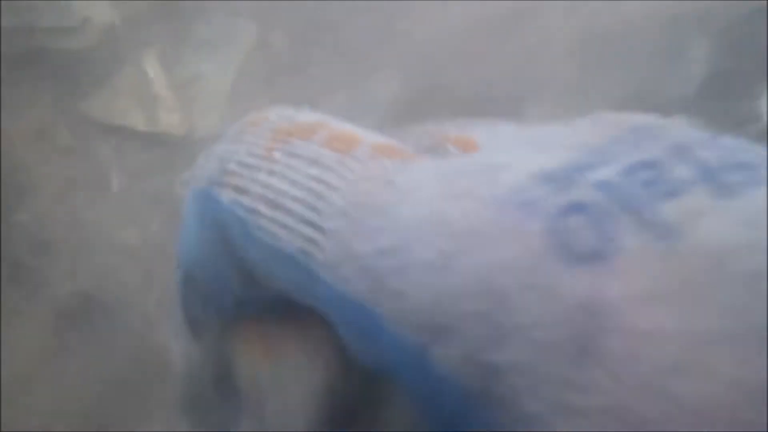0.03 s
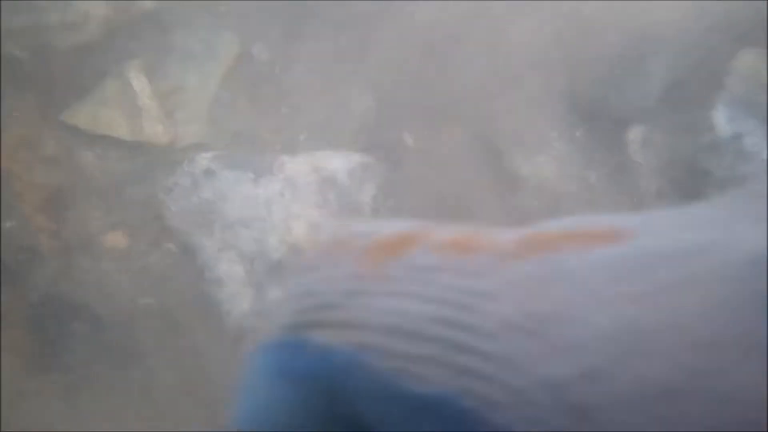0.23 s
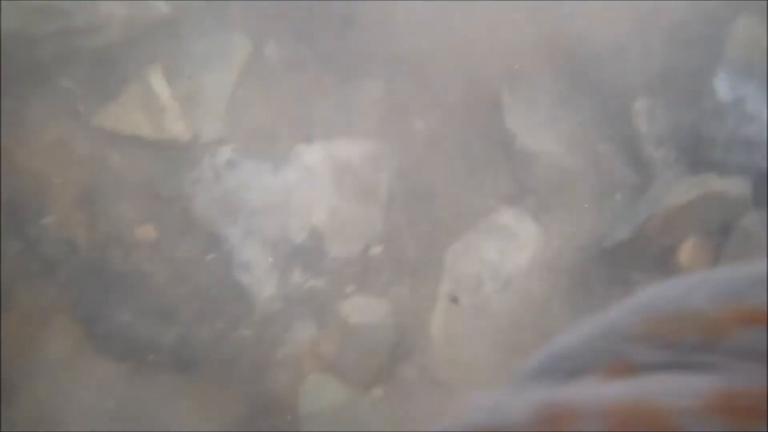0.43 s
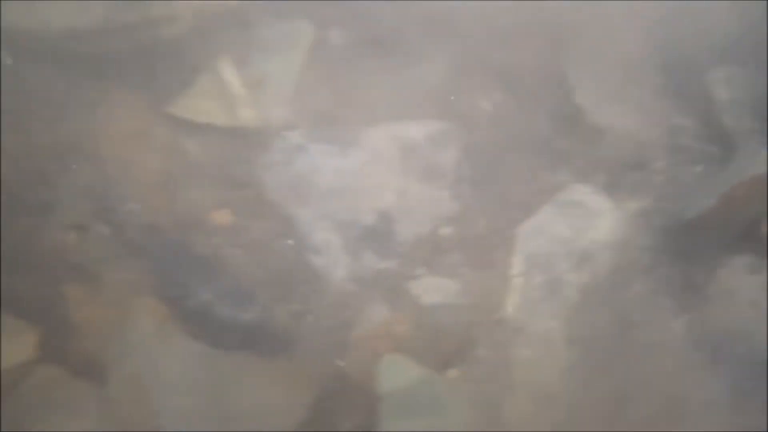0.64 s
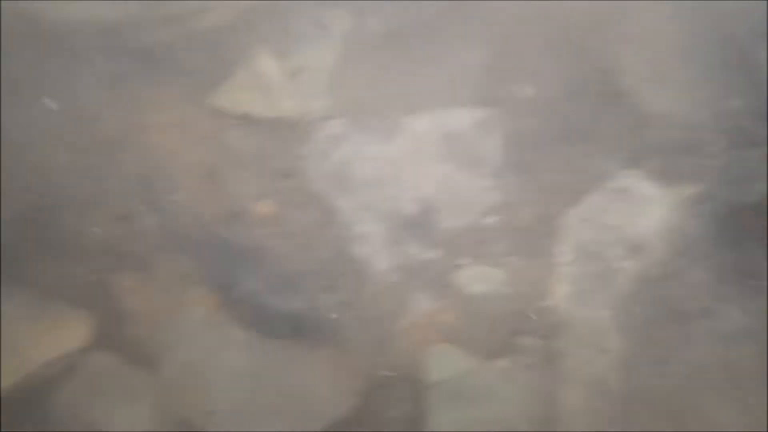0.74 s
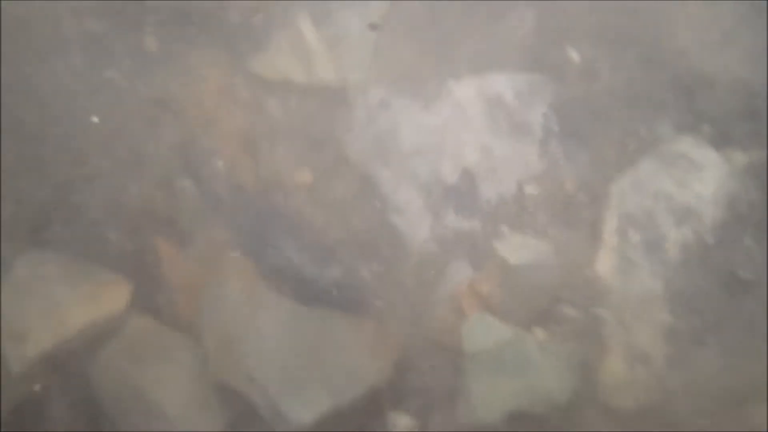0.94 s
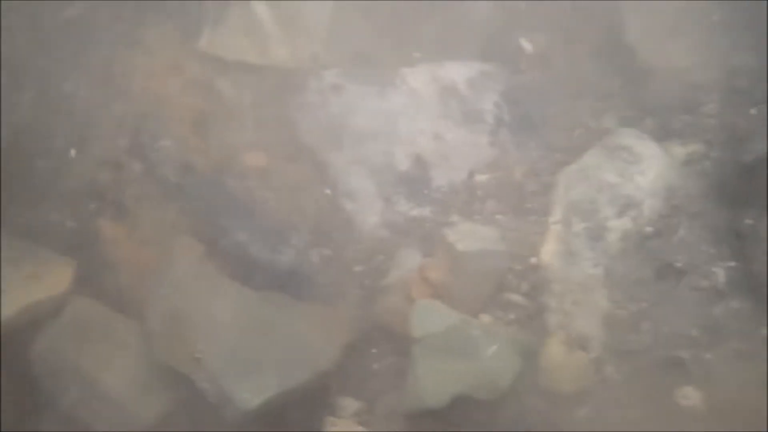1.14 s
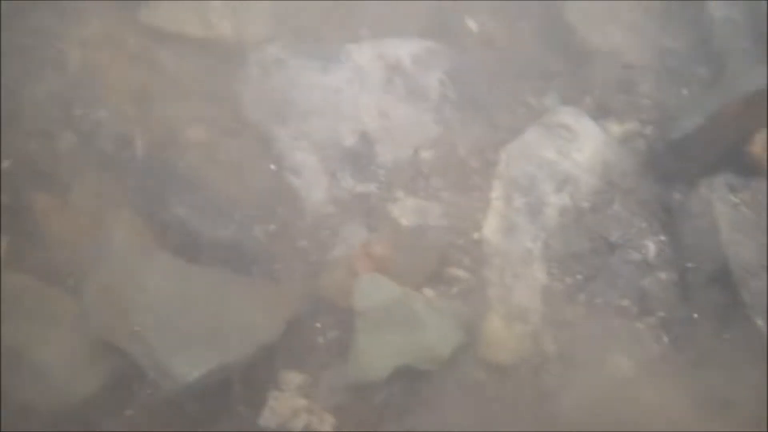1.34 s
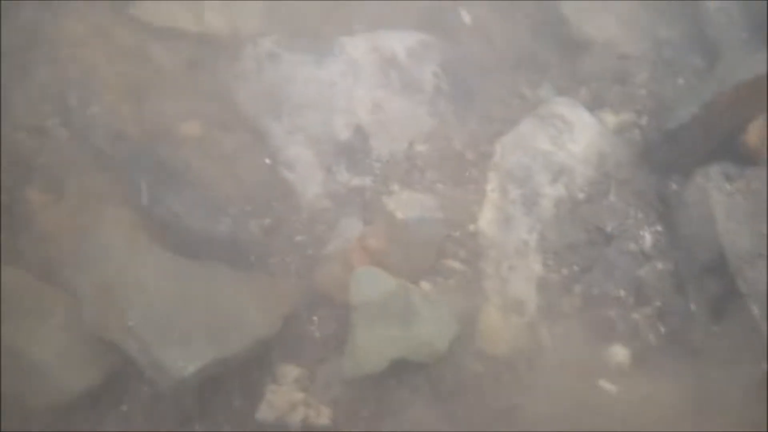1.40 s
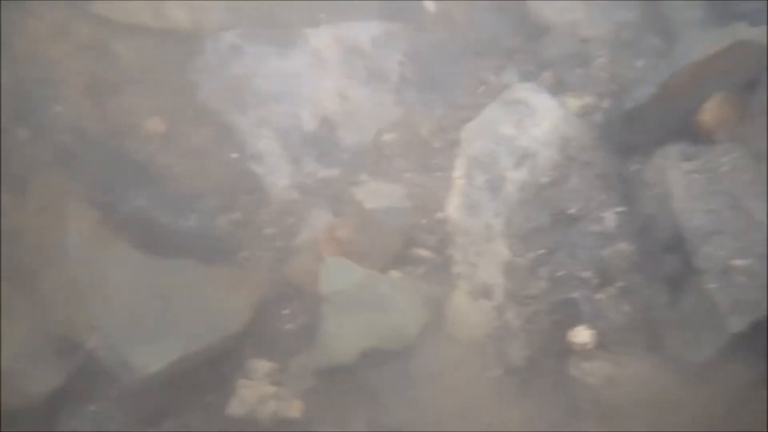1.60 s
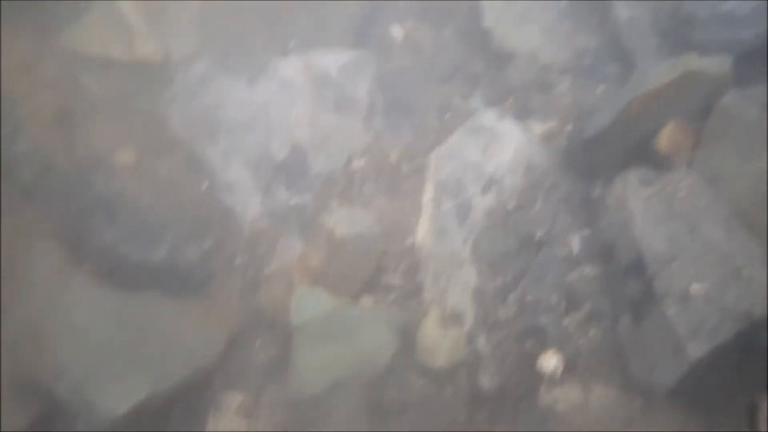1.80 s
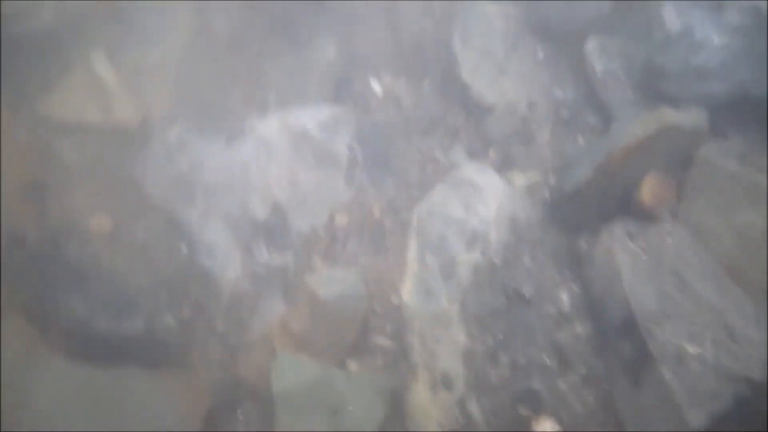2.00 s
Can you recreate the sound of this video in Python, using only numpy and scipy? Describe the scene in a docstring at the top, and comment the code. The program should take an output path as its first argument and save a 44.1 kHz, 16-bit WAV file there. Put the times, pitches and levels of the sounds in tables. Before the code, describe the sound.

Muffled underwater knocks and clicks of stones stirred by hand, over a low water rumble.

```python
"""A gloved hand fans and stirs gravel on a creek bed for two seconds, beside a camera under water.
From the start, pushed water churns, gravel rolls and sand grates over a faint rumble and hiss.
Gravel crunches, stones knock and pebbles tick, building to the hardest knocks near 0.4 seconds.
After a lull around 0.8 seconds, the hand stirs again near 1, 1.4 and 1.8 seconds.
All along, the camera's sealed case muffles the sounds and makes them honk in the left microphone."""
import sys
import numpy as np
from scipy import signal
from scipy.fft import rfft, irfft
from scipy.io import wavfile

SR = 44100
rng = np.random.default_rng(int(sys.argv[2]) if len(sys.argv) > 2 else 0)


def to_wav(s):
    """Save 16-bit WAV."""
    ch = np.atleast_2d(s).T  # columns
    pcm = np.round(np.clip(ch, -1, 1) * 32767)  # PCM
    wavfile.write(sys.argv[1], SR, pcm.astype(np.int16))


N = 90625
HIT_TIME = np.arange(3072) / SR  # seconds since a hit began

# How the case shapes sound. Each row: frequency in Hz, left gain in dB, right gain in dB.
CASE_TONE = [(40, -2.5, -9), (167, -3.5, -6), (277, 0, 1.5), (317, -3, 7.5), (376.7, 12, 12), (610, 13, -4),
             (879, 3, -8), (1028, 6, -8.5), (1444, -8, -10), (1555, -17.5, -30), (1842, 1, -6.5),
             (2144, -20.5, -36), (2280, 0.5, -11.5), (2950, -1, -6.5), (3300, -12.5, -55), (3716, 4.5, 2.5),
             (4130, -5.5, -19.5), (4980, 0, -5.5), (7300, -7, -2), (8200, 0.5, -7), (9070, -1.5, -11),
             (13900, 3, 6.5)]
# The sweeps of the hand. Each row: time in seconds, water level in dB, gravel level in dB.
HAND_SWEEPS = [(0, -30.5, -37), (.09, -31, -49.5), (.14, -20, -39.5), (.24, -21.5, -37), (.3, -15, -31),
               (.355, -25.5, -37), (.42, -15.5, -28.5), (.47, -36.5, -44.5), (.55, -37.5, -38.5),
               (.64, -42, -56.5), (.73, -43, -62), (.84, -49, -63), (.91, -33.5, -41), (.95, -28.5, -39.5),
               (1.1, -35, -45.5), (1.19, -34.5, -48), (1.25, -37, -62), (1.32, -29.5, -39.5),
               (1.4, -25.5, -41.5), (1.47, -25.5, -38.5), (1.53, -38, -66), (1.66, -38, -53),
               (1.75, -35, -66), (1.83, -24, -43.5), (1.93, -30, -48.5), (2.04, -31, -55)]
# Sand grating. Each row: time in seconds, grit level in dB, level of the sand's thin squeak in dB.
SAND_LEVELS = [(0, -57, -82), (.1, -76, -66), (.15, -60, -56), (.23, -60.5, -59), (.3, -49, -44),
               (.35, -68.5, -64), (.41, -59.5, -77), (.432, -46.5, -33), (.46, -85, -75), (.5, -69.5, -75),
               (.535, -66, -54), (.56, -80, -107), (.63, -95, -101.5), (.87, -90, -95), (.92, -71.5, -75),
               (1.0, -68, -78), (1.11, -81, -87), (1.16, -75, -68.5), (1.21, -71, -75), (1.24, -83, -104),
               (1.32, -70, -88), (1.42, -69, -82), (1.5, -84, -94.5), (1.75, -89, -98), (1.8, -76, -94),
               (1.86, -73.5, -88), (2.04, -77, -90)]
# The hiss. Each row: time in seconds, level in dB.
HISS_LEVELS = [(0, -58), (0.43, -52.5), (0.47, -67.5), (0.9, -73), (1.5, -65.5), (2.05, -60.5)]
# Gravel giving way. Each row: start in seconds, level in dB, fade time in seconds.
CRUNCHES = [(0.016, -51, 0.016), (0.44, -22, 0.006), (.456, -48, .009), (0.529, -37.5, 0.0096),
            (0.899, -60, .025), (1.08, -60, 0.022), (1.343, -44.5, 0.015), (1.792, -41.5, 0.018),
            (1.856, -48.5, .006)]
# Stones knocking. Each row: start in seconds, knock level in dB, knock pitch in Hz,
# knock fade time in seconds, thump level in dB, thump pitch in Hz, clack level in dB.
KNOCKS = [(0.0192, -22.5, 610.0, 0.00038, -30, 82, -70), (0.032, -25.5, 610.0, 0.00069, -35, 113, -71),
          (0.039, -25, 540, 0.0007, -17, 106, -56), (0.118, -40, 636, 0.00032, -18, 141, -64),
          (0.153, -45, 617, 0.0005, -26, 159, -72), (0.178, -25, 595, 0.0023, -16, 128, -43),
          (0.2164, -20, 566, 0.002, -9, 141, -42), (0.249, -23, 635, 0.00057, -12, 116, -65),
          (0.2721, -22.5, 700, 0.0016, -24, 131, -61), (0.2906, -13, 650.0, 0.0024, -4, 89, -56),
          (0.3192, -11, 670, 0.0023, -12, 140, -59), (0.3277, -11.5, 610.0, 0.002, -15, 114, -59),
          (0.3312, -16, 644, 0.0014, -4, 120, -64), (0.3635, -22, 640.0, 0.0008, -33, 83, -39),
          (0.3795, -21.5, 585, 0.0016, -7, 119, -59), (0.386, -23, 582, 0.00094, -40, 128.7, -54),
          (0.401, -2.5, 583, 0.001, -6.5, 92.6, -44.5), (0.4335, -9.5, 630, 0.0013, -7, 129, -39.5),
          (0.4398, 2.5, 723, 0.0003, -16, 158, -21), (0.4909, -28, 634, 0.00041, -20, 136, -65),
          (0.532, -19, 560, 0.0009, -17.5, 147, -34), (0.5777, -5.5, 730, 0.0011, -5.5, 158, -17),
          (0.5958, -12.5, 710, 0.00027, -11, 170, -35.5), (0.602, -17.5, 674, 0.0025, -16.5, 151, -48),
          (0.746, -40.5, 580, 0.0016, -63, 126, -79), (0.784, -41.5, 645, 0.00083, -39, 92, -59),
          (0.9246, -14.5, 720, 0.00042, -12, 164, -36), (0.931, -19.5, 597, 0.0015, -16.5, 170, -48),
          (0.936, -18.5, 660, 0.0007, -14, 149, -56), (0.964, -27, 626, 0.0011, -18, 144.5, -50),
          (0.992, -5, 690, 0.00075, -2.5, 150.6, -34), (1.0047, -48, 576, 0.0005, -16.5, 144, -62),
          (1.021, -23.5, 627, 0.0023, -18.5, 136, -56), (1.0576, -20, 730, 0.0013, -19.5, 147, -61),
          (1.064, -25.5, 620, 0.0015, -24, 145, -62), (1.171, -24.5, 680, 0.002, -22.5, 154, -71),
          (1.201, -25, 640, 0.0009, -23, 200, -75), (1.2074, -20.5, 699, 0.0046, -17, 190, -68),
          (1.344, -11.5, 509, 0.0037, -59, 187, -38), (1.3522, -10, 537, 0.002, -7, 196, -40),
          (1.3737, -33, 580.0, 0.00062, -17.5, 136, -63), (1.408, -31, 660, 0.0038, -20, 153, -56),
          (1.548, -37.5, 644, 0.01, -53, 102, -61), (1.571, -37.5, 626, 0.0002, -22.5, 100, -57),
          (1.612, -33.5, 664, 0.01, -51, 112, -66), (1.652, -43.5, 853, 0.00036, -39.5, 130, -56),
          (1.7707, -28.5, 610.0, 0.0045, -17, 172, -77), (1.7932, -21, 744, 0.0014, -18, 152, -56),
          (1.8008, -17.5, 650, 0.0017, -12.5, 205, -40.5), (1.8129, -16.5, 680, 0.0024, -19.5, 104, -34),
          (1.868, -29, 654, 0.00034, -16.5, 78.5, -56), (1.9098, -25.5, 636, 0.0039, -24, 108, -50.5),
          (1.929, -27.5, 610, 0.0021, -25, 161, -52), (1.988, -31.5, 610.0, 0.0039, -23, 139, -68)]
# The notes a stone rings with. Each row: pitch in Hz, relative level in dB, fade time in seconds.
STONE_NOTES = [(1873, 3, 0.0019), (2714, 2.5, 0.0013), (3850, -7, 0.001), (4530, -9, .0011)]
# Pebbles hitting the case. Each row: start in seconds, peak level in dB, ring pitch in Hz,
# fade time of the crunch in seconds, ring boost in dB.
TICKS = [(.0887, -42.5, 8200, 0.00073, 8), (0.1502, -40, 4900, 0.0015, 9), (0.2177, -35.5, 8500, .0027, 12),
         (.2732, -40, 7700, 0.0028, 21), (.286, -34, 6960, 0.0018, 31), (.2935, -32.5, 7600, 0.0033, 23),
         (0.3107, -39.5, 7160, 0.0056, 34), (.363, -52, 3680, 0.0011, 15), (0.4002, -36, 5430, .0013, 6.5),
         (0.428, -27, 8200, 0.0034, 6), (0.427, -24.5, 3850, 0.0012, 21), (.433, -29, 8200, 0.0025, 31.5),
         (0.4395, -25, 5500, .0007, 8), (0.4455, -39, 5120, 0.0017, 4), (0.5128, -45, 7600, 0.00073, 14),
         (0.527, -34.5, 8200, 0.002, 22), (0.5785, -37, 7200, 0.00022, 26), (0.9646, -46, 5350, .0009, 4),
         (0.9927, -40, 8200, 0.0032, 13), (1.0577, -43.5, 8200, 0.0022, 22), (1.0583, -51, 5500, 0.0011, 8),
         (1.172, -48, 8600, 0.0013, 22), (1.195, -50, 8600, 0.0027, 14), (1.2076, -44.5, 8500, 0.0057, 16),
         (1.2111, -42, 5130, 0.0012, 17), (1.277, -43, 4400, 0.00053, 13),
         (1.3095, -38.5, 12040, 0.0046, 8), (1.3432, -35.5, 8200, 0.0015, 5),
         (1.3822, -52, 5270, 0.00087, 16), (1.4297, -51, 8300, .0006, 10),
         (1.652, -54, 2430, 0.00085, 11.5), (1.7709, -34.5, 7400, 0.0017, 17),
         (1.7785, -41.5, 5550, 0.0032, 8), (1.8004, -49, 7250, .001, 7), (1.8124, -43, 7080, 0.00036, 29),
         (1.8131, -31.5, 3400, 0.0018, 22), (1.856, -51.5, 2470, 0.0014, 19), (1.909, -52, 3300, 0.001, 17),
         (1.9287, -55.5, 8650, 0.0011, 20)]

# The tone of each sound, from low to high. Each row: frequency in Hz, relative level in dB.
BIG_SWIRL_TONE = [(10, -32.5), (30, 6.5), (50, 5), (78, 0.5), (120, -3.5), (170, -5.5), (235, -22.5),
                  (450, -46.5), (900, -65.5), (2000, -79.5)]
SMALL_SWIRL_TONE = [(80, -31), (190, 1), (260, -6.5), (420, -39.5), (1500, -100)]
GRAVEL_TONE = [(40, -22), (160, 1.5), (300, 6), (450, -6), (700, 5), (1000, -11.5), (1400, -17),
               (2200, -25), (4000, -40.5), (12000, -73)]
SAND_TONE = [(200, -36.5), (1500, -6), (3000, -3.5), (5000, 7.5), (6500, -4), (7200, 8), (8000, -5.5),
             (9000, -2), (11000, -6), (15000, -3)]
SAND_SQUEAK_TONE = [(3000, -53), (6500, -25.5), (7200, -2.5), (7750, -10.5), (8050, 7.5), (8300, 6.5),
                    (8600, -4.5), (9100, -13.5), (15000, -48.5)]
CURRENT_TONE = [(20, -12), (140, 3.5), (210, -7.5), (300, -26), (600, -48.5), (1000, -25), (2000, -100)]
HISS_TONE = [(300, 8.5), (2000, -2.5), (3500, -11), (5500, -1.5), (9000, 1), (15000, 11)]
CRUNCH_TONE = [(200, -28), (700, -0.5), (1250, 5.5), (1700, -4.5), (2500, -19), (4000, -14), (8000, -35.5),
               (15000, -38.5)]
CLACK_TONE = [(100, 13), (700, 7.5), (1250, 26), (1700, -32), (2500, 20), (4000, 0.5), (7000, -4),
              (10000, -21.5), (15000, -7)]
PEBBLE_TONE = [(200, -22), (1500, -5), (4000, -1), (7000, 0), (9500, -3), (12000, -5), (15000, -10),
               (17000, -30)]


def gain(db):
    """Turns decibels into a number to multiply a sound by."""
    return 10 ** (np.asarray(db) / 20)


def curve(table, column=1):
    """Joins a table's points with straight lines, giving a value for every sample."""
    table = np.array(table)
    return np.interp(np.arange(N) / SR, table[:, 0], table[:, column])


def shape_tone(sound, tone, column=1, size=4096):
    """Turns each frequency up or down as a tone table says."""
    tone = np.array(tone)
    hz = np.fft.rfftfreq(size, 1 / SR)
    db = np.interp(np.log(hz + 1), np.log(tone[:, 0] + 1), tone[:, column])
    # These steps make a filter that rings only after a hit, never before it.
    cepstrum = irfft(np.log(gain(db)))
    cepstrum[1:size // 2] *= 2
    cepstrum[size // 2 + 1:] = 0
    response = irfft(np.exp(rfft(cepstrum)))[:size // 2]
    return signal.fftconvolve(sound, response)[:len(sound)]


def through_case(force, right_lag_s=0.00033):
    """A push on the case as two microphones hear it; low sounds reach the right one a little later."""
    samples = np.arange(len(force))
    late = np.interp(samples - right_lag_s * SR, samples, force, left=0)
    right = force + signal.lfilter(*signal.butter(1, 1500, fs=SR), late - force)
    return np.array([shape_tone(force, CASE_TONE, column=1), shape_tone(right, CASE_TONE, column=2)])


def lasting_sound(force, tone):
    """A long push, given a tone and heard through the case, with a typical size of one on the left."""
    heard = through_case(shape_tone(force, tone))
    return heard / heard[0].std()


def add_hit(mix, start_s, force, peak_db):
    """Adds a short push heard through the case, with its peak level set on the left."""
    heard = through_case(force)
    peak = abs(signal.hilbert(heard[0])).max()
    part = mix[:, round(start_s * SR):][:, :len(force)]
    part += gain(peak_db) * heard[:, :part.shape[1]] / peak


def grains(per_second, spread_db):
    """Tiny hits at random times, mostly small, a few large."""
    sizes = gain(spread_db * np.minimum(rng.exponential(1, N), 4))
    return sizes * rng.choice([-1, 1], N) * (rng.random(N) < per_second / SR)


def grain_stream(tone, per_second, spread_db, one_side_db):
    """A stream of grains heard through the case; some reach only one microphone."""
    shared, left, right = (lasting_sound(grains(per_second, spread_db), tone) for _ in range(3))
    return shared + gain(one_side_db) * np.array([left[0], right[1]])


def noise_burst(fade_s, db):
    """A puff of noise that dies away."""
    return gain(db) * rng.standard_normal(len(HIT_TIME)) * np.exp(-HIT_TIME / fade_s)


def contact(fade_s, crunch_db):
    """One sharp click and the brief crunch that follows it."""
    return (HIT_TIME == 0) + noise_burst(fade_s, crunch_db)


def ring(hz, rise_s, fade_s):
    """A single note that swells and quickly dies away."""
    loudness = (1 - np.exp(-HIT_TIME / rise_s)) * np.exp(-HIT_TIME / fade_s)
    return loudness * np.sin(2 * np.pi * hz * HIT_TIME)


def churning_water():
    """Swirls from the hand push on the case; a faster sweep makes smaller, higher-sounding ones."""
    big_db = curve(HAND_SWEEPS, column=1)
    small_db = big_db - 9.5 + 0.41 * (big_db - big_db.max())  # drops faster as the hand slows
    big = lasting_sound(rng.standard_normal(N), BIG_SWIRL_TONE)
    small = lasting_sound(rng.standard_normal(N), SMALL_SWIRL_TONE)
    return big * gain(big_db) + small * gain(small_db)


def rolling_gravel():
    """Stones roll under the hand and make many dull little bumps."""
    bumps = grain_stream(GRAVEL_TONE, per_second=1100, spread_db=6.5, one_side_db=-13.5)
    return bumps * gain(curve(HAND_SWEEPS, column=2))


def grating_sand():
    """Fine grains grate on the case; sand rubbing under the glove gives a thin, high rasp."""
    grit = grain_stream(SAND_TONE, per_second=1700, spread_db=5.5, one_side_db=-28.5)
    rasp = grain_stream(SAND_SQUEAK_TONE, per_second=900, spread_db=5.5, one_side_db=-28.5)
    return grit * gain(curve(SAND_LEVELS, column=1)) + rasp * gain(curve(SAND_LEVELS, column=2))


def creek_current():
    """The flowing creek makes a faint, steady rumble."""
    return gain(-63) * lasting_sound(rng.standard_normal(N), CURRENT_TONE)


def hiss():
    """Each microphone has its own faint hiss, which dips after the hardest knock and slowly returns."""
    noise = np.array([shape_tone(rng.standard_normal(N), HISS_TONE) for _ in range(2)])
    return gain(curve(HISS_LEVELS)) * noise / noise.std()


def crunching_gravel(rise_s=0.0017):
    """Patches of gravel give way, each in a short burst of tiny hits."""
    time, loudness = np.arange(N) / SR, np.zeros(N)
    for start_s, db, fade_s in CRUNCHES:
        age = np.maximum(time - start_s, 0)
        loudness += gain(db) * np.minimum(age / rise_s, 1) * np.exp(-age / fade_s)
    return loudness * grain_stream(CRUNCH_TONE, per_second=1700, spread_db=2, one_side_db=-13.5)


def knocking_stones():
    """Each stone gives a hollow knock, a low thump the water stops at once, and a hard, crumbly clack."""
    mix = np.zeros((2, N))
    for start_s, knock_db, knock_hz, fade_s, thump_db, thump_hz, clack_db in KNOCKS:
        knock = ring(knock_hz, rise_s=0.00023, fade_s=fade_s)
        thump = ring(thump_hz, rise_s=0.0027, fade_s=0.49 / thump_hz)  # fades in about half a wave
        crumble = noise_burst(fade_s=0.006, db=-32)
        clack = shape_tone(contact(fade_s=0.002, crunch_db=-21.5) + crumble, CLACK_TONE)
        notes = sum(gain(db - 13) * ring(hz, 1 / SR, note_s) for hz, db, note_s in STONE_NOTES)
        add_hit(mix, start_s, knock, knock_db)
        add_hit(mix, start_s, thump, thump_db)
        add_hit(mix, start_s, clack + notes, clack_db)
    return mix


def ticking_pebbles(ring_width_hz=370):
    """Pebbles hit the case and crunch briefly; some ring at their own pitch, others only crack."""
    mix = np.zeros((2, N))
    for start_s, peak_db, ring_hz, fade_s, ring_db in TICKS:
        crack = shape_tone(contact(fade_s, crunch_db=-5.5), PEBBLE_TONE)
        ping = signal.lfilter(*signal.iirpeak(ring_hz, ring_hz / ring_width_hz, fs=SR), crack)
        add_hit(mix, start_s, crack + gain(ring_db) * ping, peak_db)
    return mix


def scene():
    """Adds all the sounds together, in a left and a right channel."""
    hits = knocking_stones() + ticking_pebbles() + crunching_gravel()
    return hits + churning_water() + rolling_gravel() + grating_sand() + creek_current() + hiss()


def record(dry, low_cut_hz=46, ceiling_db=-0.4, soften_hz=9300, highest_hz=15600):
    """Trims the deepest bass, squashes the loudest peaks, softens the treble and cuts off the very top."""
    trimmed = signal.lfilter(*signal.butter(2, low_cut_hz, "high", fs=SR), dry)
    squashed = trimmed / (1 + (trimmed / gain(ceiling_db)) ** 24) ** (1 / 24)
    softened = signal.lfilter(*signal.butter(2, soften_hz, fs=SR), squashed)
    top_cut = signal.firwin(255, highest_hz, window=("kaiser", 9), fs=SR)
    return signal.oaconvolve(softened, top_cut[None], "same")


dry = scene()
out = record(dry)
to_wav(out)
```